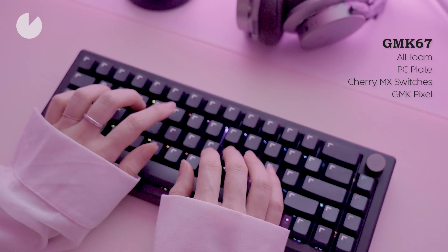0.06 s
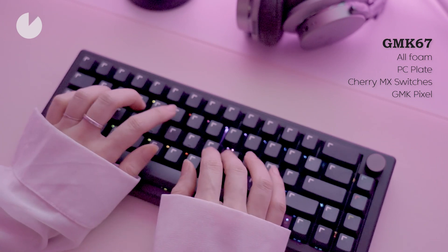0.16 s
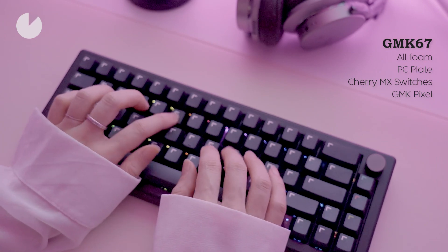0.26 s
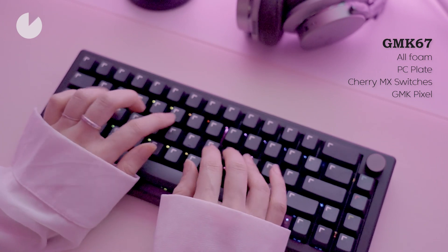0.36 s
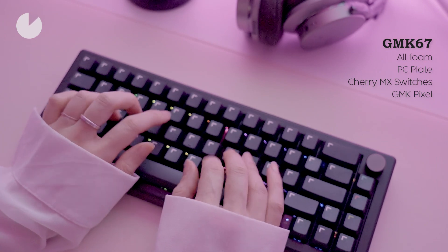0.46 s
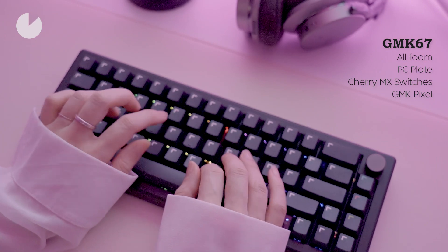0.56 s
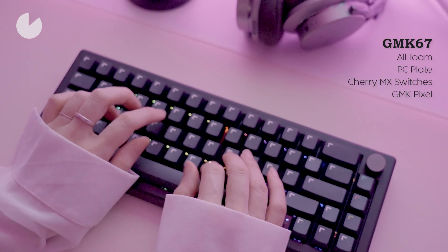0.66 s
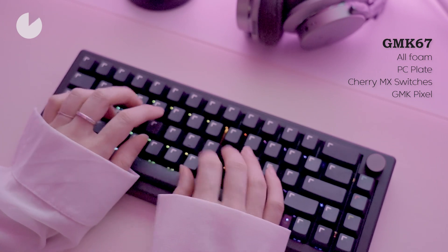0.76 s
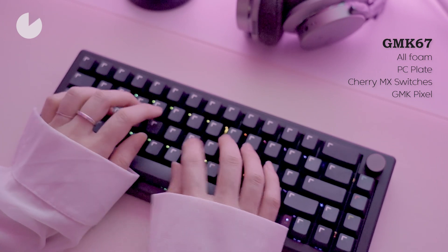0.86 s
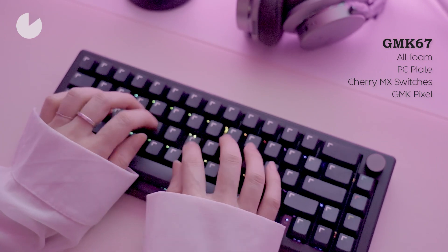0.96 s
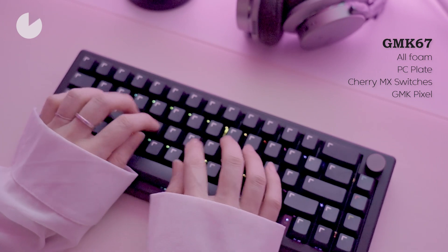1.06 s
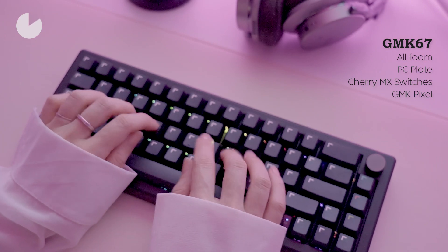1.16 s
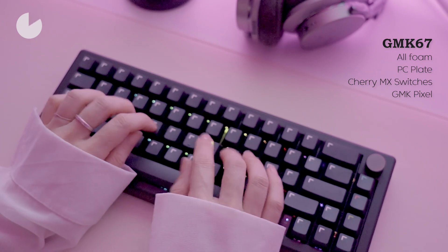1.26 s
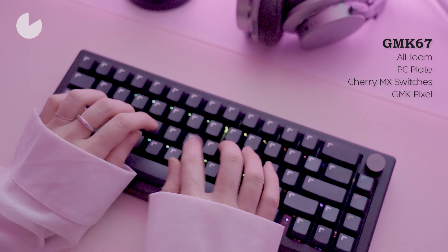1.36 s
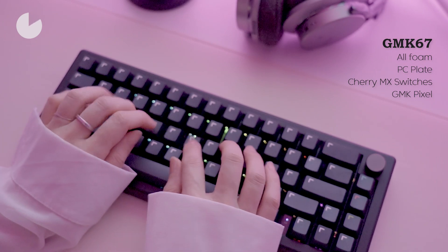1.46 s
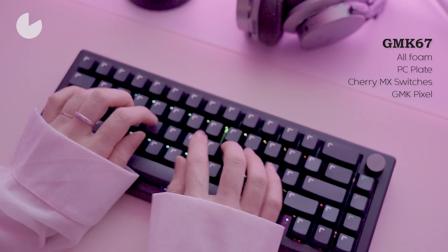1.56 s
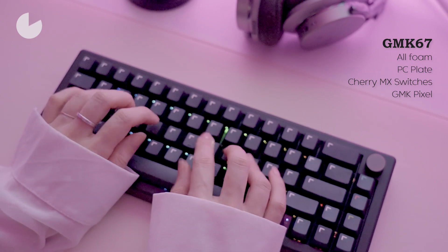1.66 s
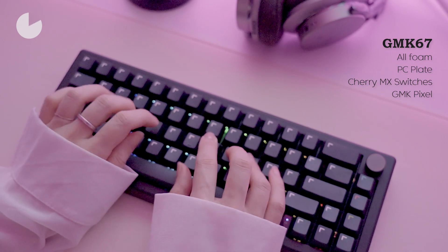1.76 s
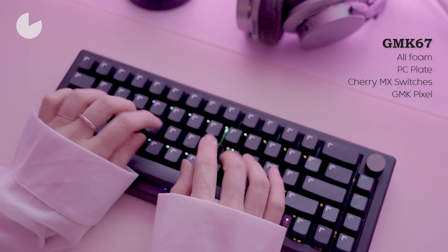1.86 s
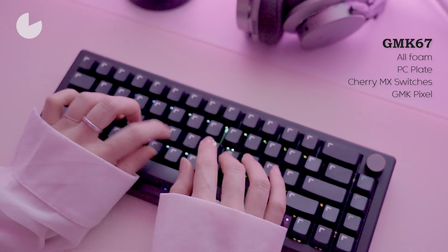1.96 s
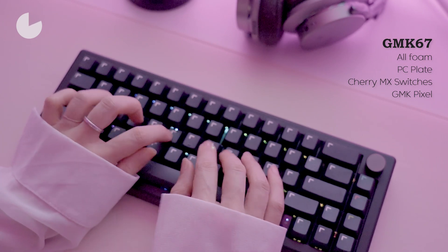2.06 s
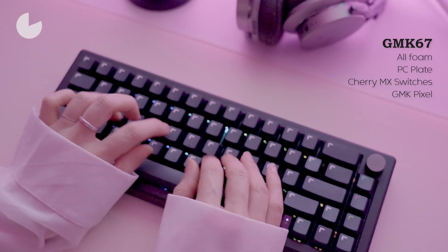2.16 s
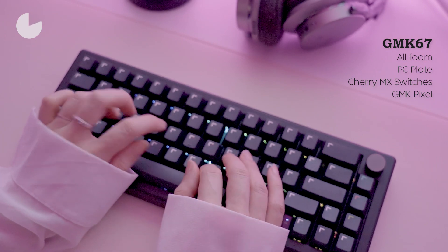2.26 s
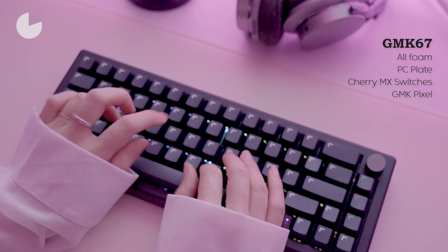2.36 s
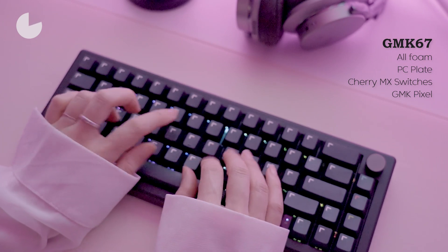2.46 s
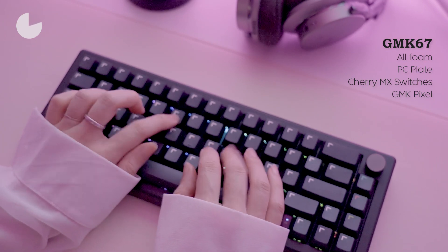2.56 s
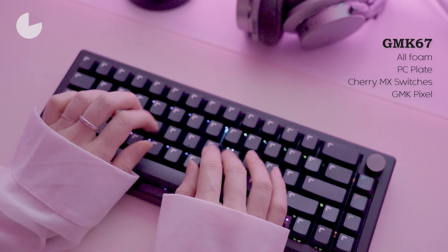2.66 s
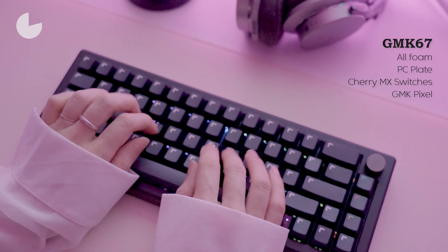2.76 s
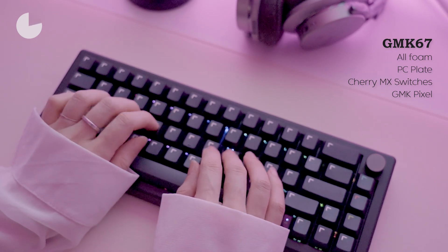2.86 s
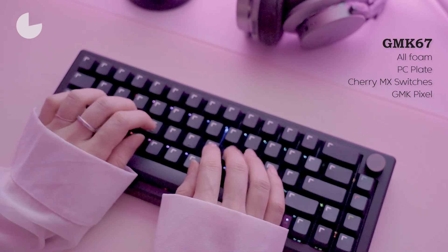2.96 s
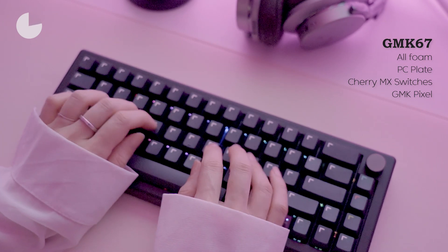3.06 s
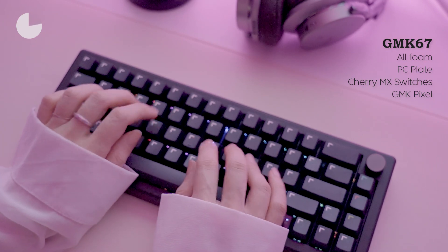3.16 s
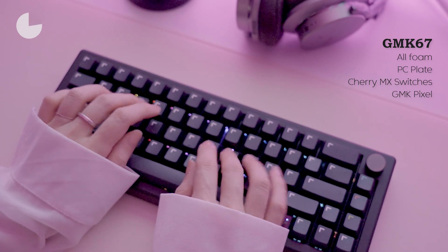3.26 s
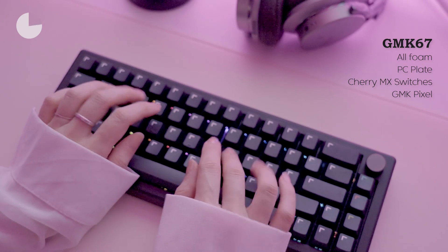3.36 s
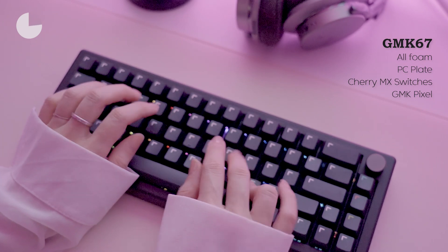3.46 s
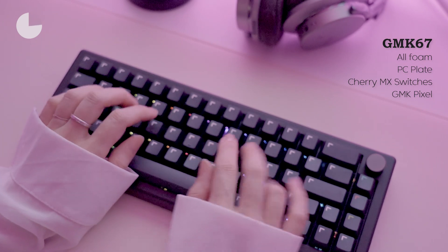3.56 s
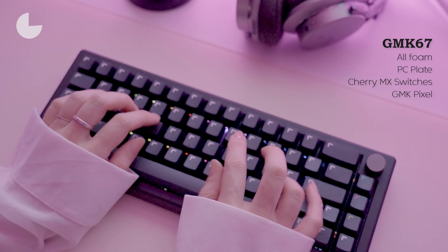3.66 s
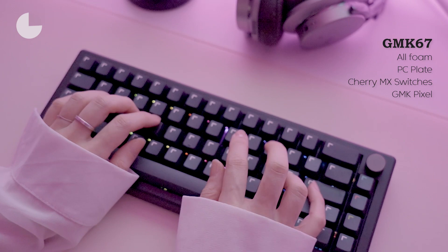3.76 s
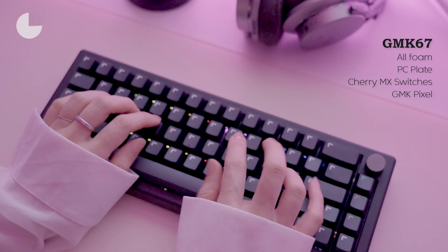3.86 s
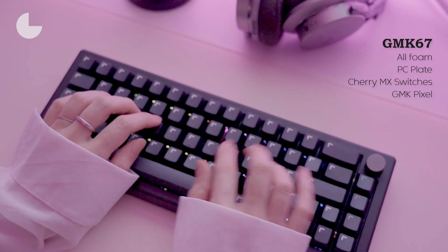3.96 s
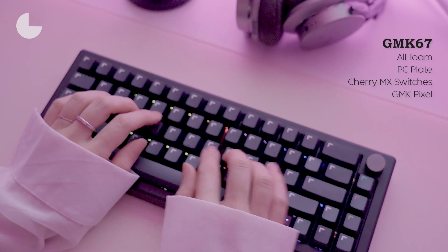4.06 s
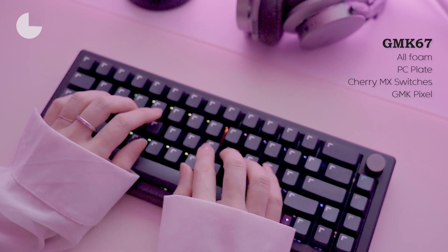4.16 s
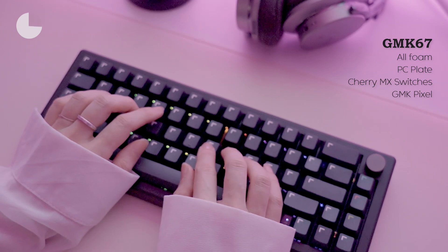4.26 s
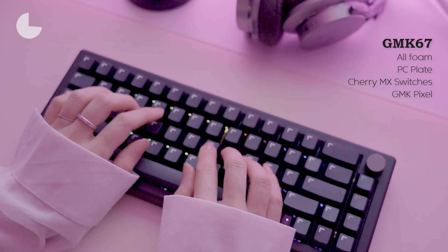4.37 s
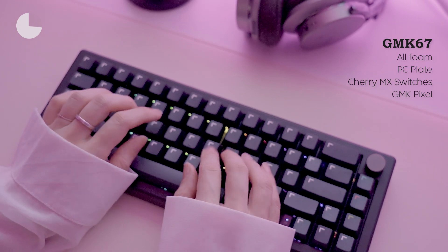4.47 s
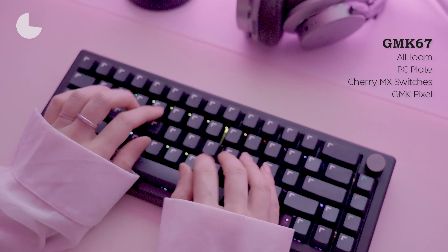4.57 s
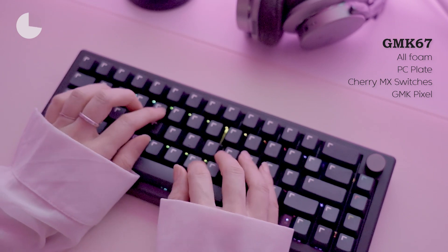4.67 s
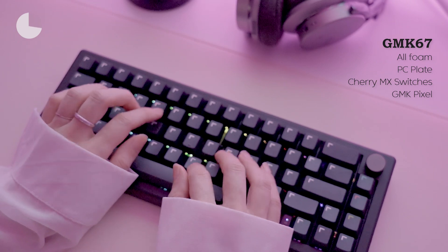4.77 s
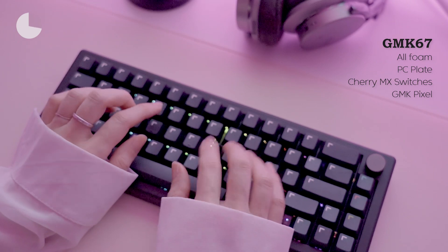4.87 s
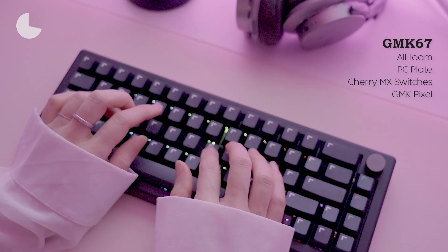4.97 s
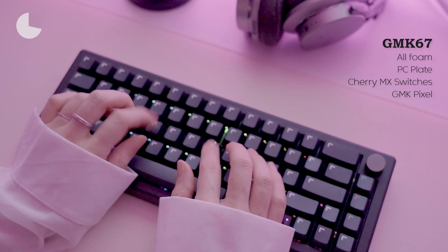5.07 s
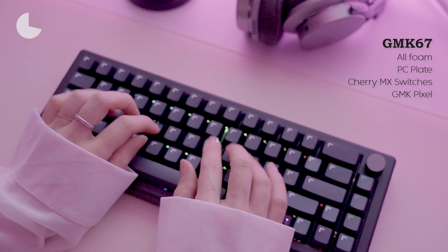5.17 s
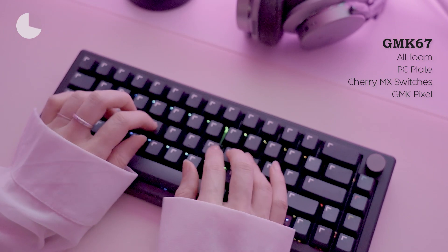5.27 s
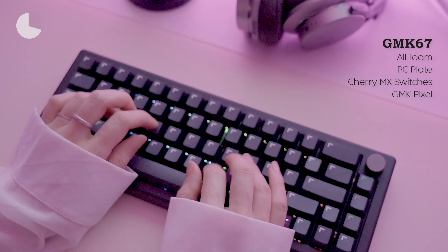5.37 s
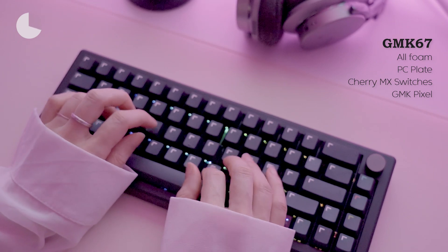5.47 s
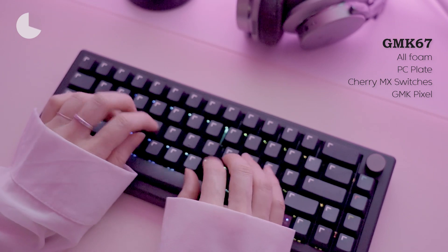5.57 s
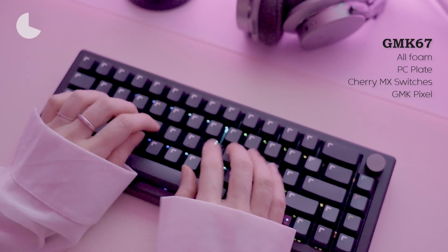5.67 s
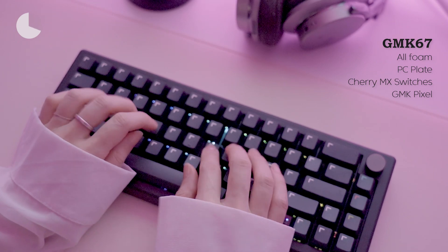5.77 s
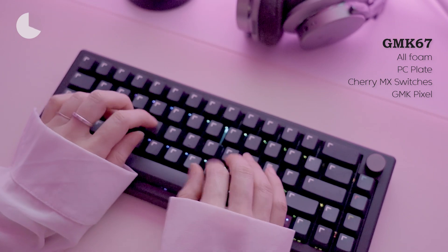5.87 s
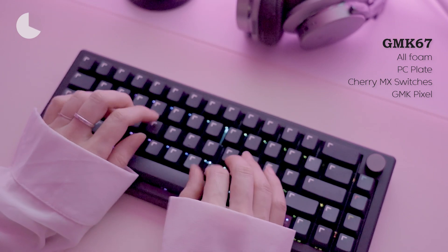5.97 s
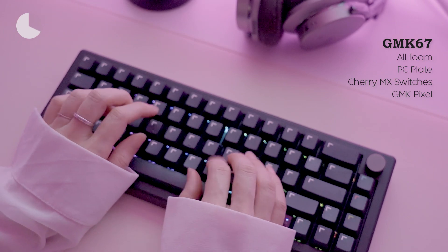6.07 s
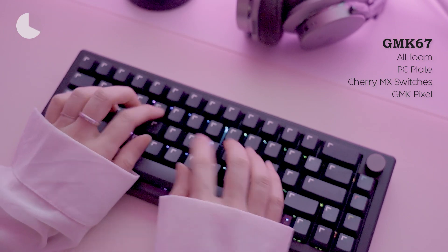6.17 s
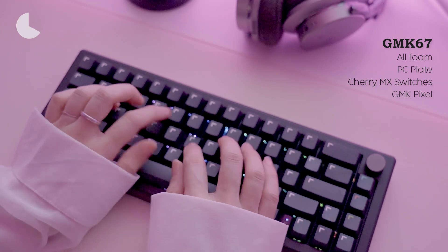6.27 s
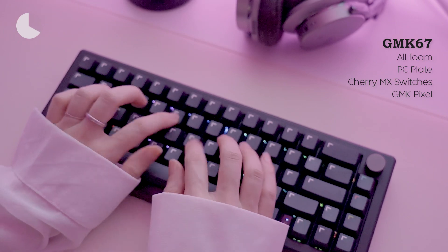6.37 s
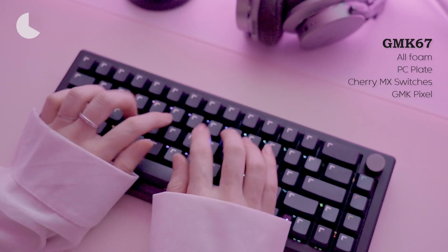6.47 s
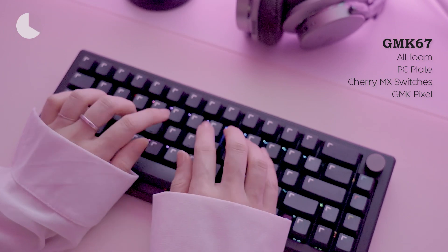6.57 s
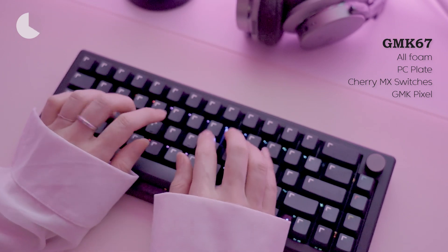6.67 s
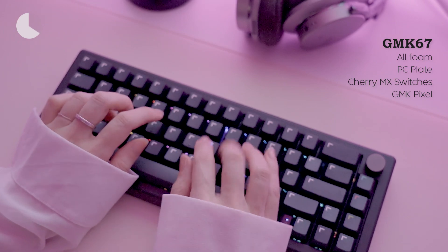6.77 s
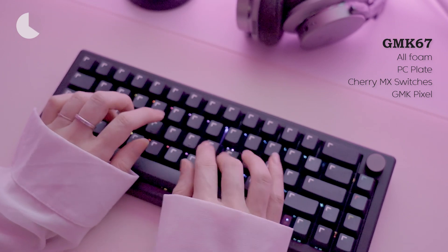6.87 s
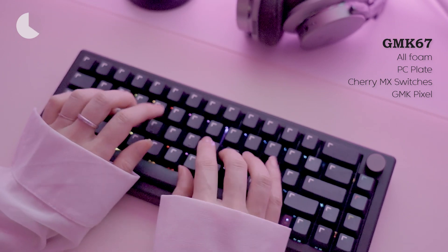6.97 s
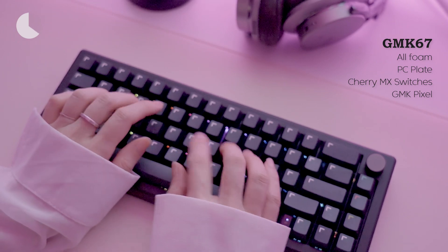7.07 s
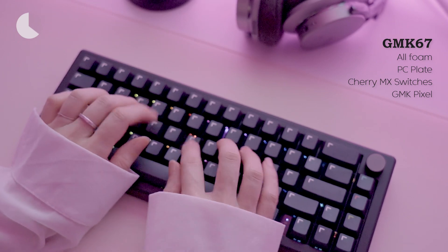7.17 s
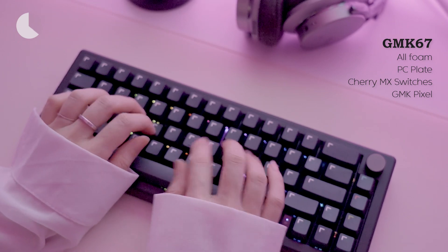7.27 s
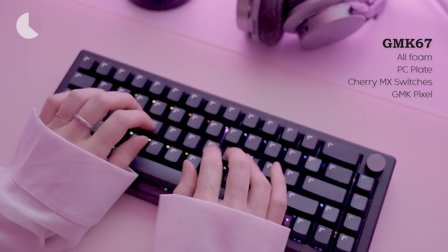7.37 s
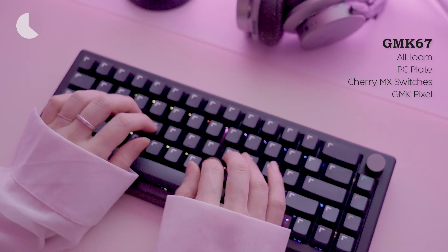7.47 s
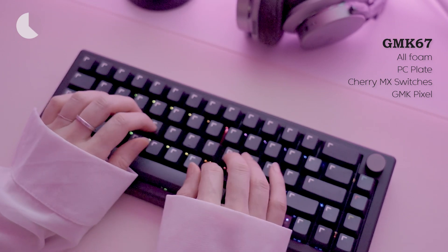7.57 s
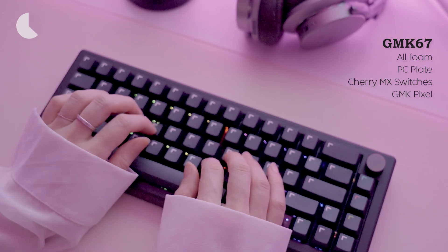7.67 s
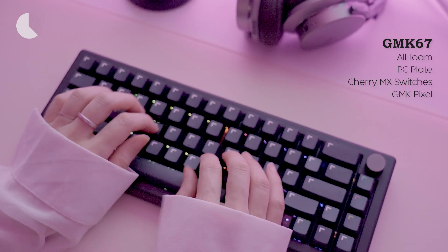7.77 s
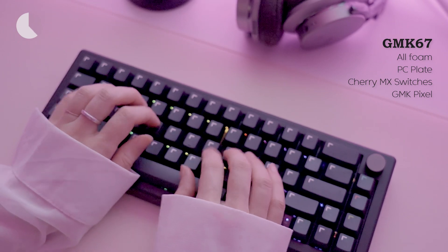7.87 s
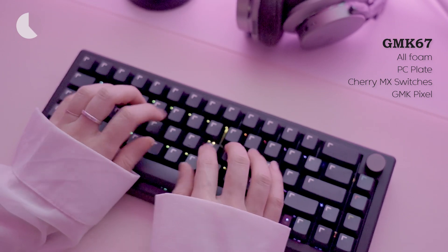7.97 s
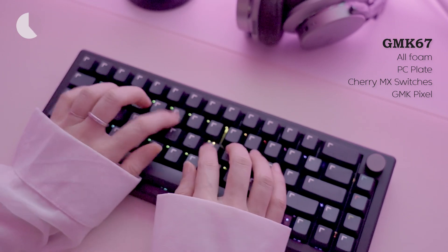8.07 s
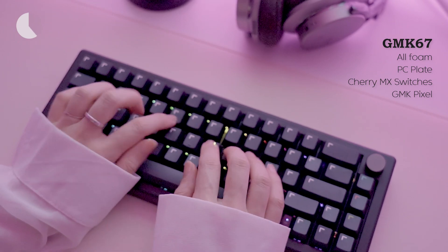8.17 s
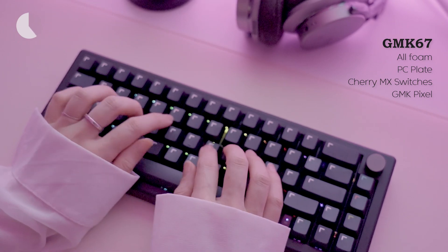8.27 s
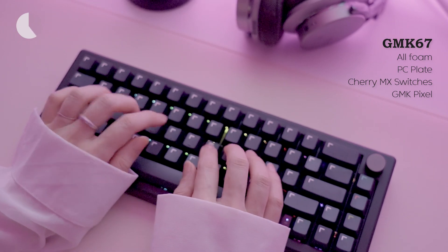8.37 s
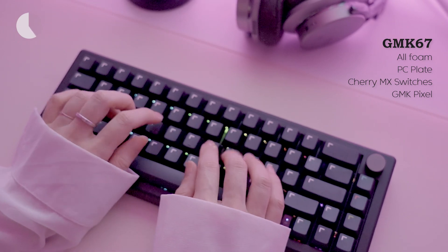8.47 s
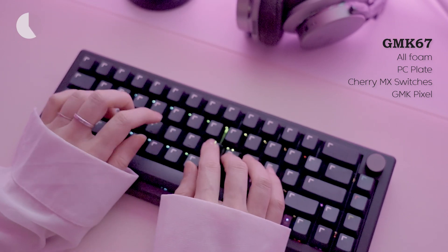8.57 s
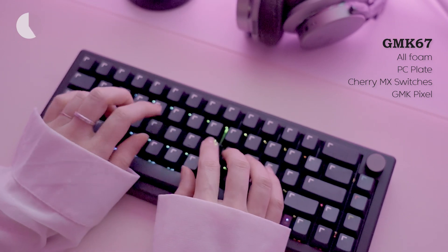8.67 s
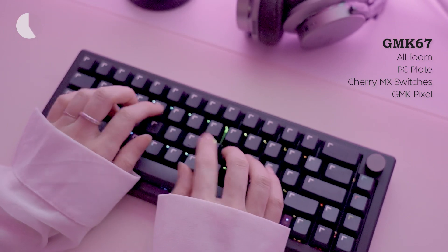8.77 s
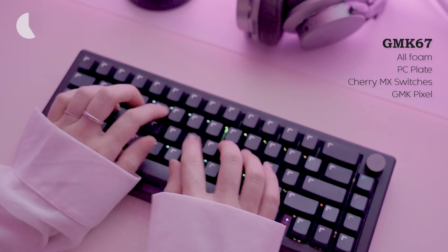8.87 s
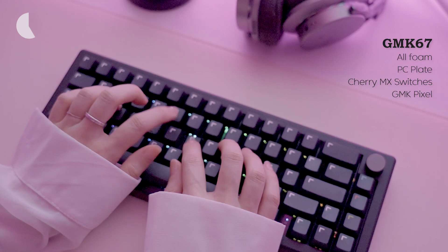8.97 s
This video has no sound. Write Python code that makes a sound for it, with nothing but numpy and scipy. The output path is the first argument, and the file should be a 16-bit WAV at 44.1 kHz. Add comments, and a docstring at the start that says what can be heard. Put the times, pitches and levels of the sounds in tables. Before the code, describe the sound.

From 0 s a soft, low fan whoosh and barely audible motor hum lie under close typing on a foam-filled mechanical keyboard on a desk. After a light first touch, rapid irregular keystrokes run until about 3.55 s, often over twenty small contacts per second counting presses and releases. Each is a very short, muted, mid-pitched knock with a plastic clack and fine tick. The long bar adds deeper thumps with slight rattle and metallic ring near 0.86, 1.8 and 2.5 s. Around 3.6 s fingertips brush the caps faintly; then comes a sparse pause with a few weak taps and a hard, dull knock near 3.97 s. Near 4.7 s quick typing resumes, continuing to about 9 s, with heavier bar strokes at 5.7, 6.1, 7.03 (strongest), 7.9 and 8.76 s, and a sharp accent at 7.33 s. Dry, close, small quiet room.

```python
"""Quick typing on a foam-filled mechanical keyboard on a desk, close to one microphone in a small quiet room.
Fan noise, a wavering motor hum and the slide of fingertips are there from the start. Then come the keys: each
contact knocks the plate, clacks the cap, ticks in the switch and thumps case and desk, and the room adds a short
tail. Loose contacts chatter. Before one second the long bar's wire first rings. Near 3.6 s fingertips brush the
caps; a pause with only a few contacts follows, one a hard, dull knock, then quick typing from about 4.7 s on."""
import sys
import numpy as np
from scipy import signal
from scipy.fft import rfft, irfft
from scipy.io import wavfile
from scipy.ndimage import uniform_filter1d

SR = 44100
rng = np.random.default_rng(int(sys.argv[2]) if len(sys.argv) > 2 else 0)


def wav_out(sig):
    """Save sig, one row per channel (or a flat mono array), as 16-bit PCM at SR to the path in sys.argv[1]."""
    wavfile.write(sys.argv[1], SR, np.round(np.clip(np.atleast_2d(sig).T, -1, 1) * 32767).astype(np.int16))


N = 397782

# Every key contact, with the strength of each part before chatter and filtering:
# start_s, plate_knock_db, plate_pitch_hz (under the key), case_thump_db, cap_clack_db, stem_tick_db
KEY_CONTACTS = [(0.116, -33, 1160, -54, -48.5, -63), (0.216, -26, 1340, -41, -32.5, -42),
                (0.336, -25.5, 1150, -45, -34, -45), (0.402, -40, 1240, -49, -48, -57),
                (0.451, -30.5, 1220, -42, -38.5, -50), (0.485, -36, 920, -48, -45, -47),
                (0.527, -26.5, 1330, -36, -33.5, -34.5), (0.572, -33, 870, -56, -49, -63),
                (0.601, -34.5, 1170, -47, -42, -49), (0.622, -28, 1120, -43, -38, -46),
                (0.643, -26.5, 810, -42.5, -31.5, -47), (0.688, -35, 990, -48, -44, -44),
                (0.722, -28, 950, -32, -34.5, -36.5), (0.81, -33, 1070, -47, -45, -63),
                (0.841, -30, 1090, -47, -46, -50), (0.861, -22.5, 1170, -21.5, -26.5, -40.5),
                (0.923, -30.5, 1010, -40, -36.5, -50), (0.936, -47, 1070, -41, -57, -45),
                (0.967, -38, 1020, -53, -60, -74), (0.991, -39, 1160, -65, -68, -67),
                (1.03, -32.5, 920, -47, -37, -47), (1.069, -39, 1010, -45, -48, -50),
                (1.085, -29.5, 1000, -47, -37.5, -49), (1.113, -30, 1120, -53, -49, -55),
                (1.138, -28, 940, -44, -39.5, -57), (1.181, -29.5, 1010, -40.5, -43, -43),
                (1.215, -25.5, 1170, -35.5, -26.5, -35.5), (1.253, -35.5, 1070, -45, -45, -37),
                (1.284, -29, 1310, -45, -37.5, -53), (1.302, -25, 930, -49, -46, -50),
                (1.372, -35, 890, -57, -45, -45), (1.379, -28, 1330, -38.5, -44, -61),
                (1.403, -22, 830, -30, -29.5, -39.5), (1.495, -29.5, 1020, -45, -34, -45.5),
                (1.55, -34, 1070, -42, -58, -64), (1.597, -26, 940, -39, -37.5, -55),
                (1.682, -24, 1120, -36, -33.5, -41), (1.73, -28.5, 1270, -52, -36.5, -44),
                (1.774, -31, 1020, -49, -42, -50), (1.785, -28.5, 1100, -40, -43, -65),
                (1.795, -23.5, 1160, -23, -28.5, -47), (1.844, -32, 800, -51, -50, -53),
                (1.887, -31.5, 1120, -32, -42, -42.5), (1.898, -31.5, 940, -47, -37.5, -54),
                (1.951, -32.5, 1050, -37.5, -42, -39), (1.974, -25, 1440, -47, -40, -44),
                (2.008, -30.5, 840, -35, -47, -52), (2.047, -37, 1090, -48, -64, -73),
                (2.07, -38, 1110, -48, -42, -43), (2.1, -25.5, 930, -36, -33.5, -44.5),
                (2.133, -26.5, 1160, -56, -47, -53), (2.175, -33.5, 1110, -51, -54, -65),
                (2.207, -27.5, 840, -44, -33.5, -45), (2.237, -36, 855, -47, -49, -47),
                (2.272, -27, 810, -28.5, -30, -30.5), (2.305, -33, 1210, -47, -48, -48),
                (2.359, -21, 1080, -40, -29, -39.5), (2.433, -38, 1070, -46, -46, -46),
                (2.467, -27.5, 880, -31.5, -38, -38), (2.486, -36, 1080, -51, -42, -44),
                (2.515, -29, 1230, -27.5, -41, -55), (2.607, -28.5, 1020, -40, -46, -46),
                (2.629, -34, 1090, -50, -43.5, -56), (2.648, -31, 1040, -51, -53, -61),
                (2.705, -23.5, 1230, -38, -31, -44), (2.77, -38, 960, -45, -41.5, -41),
                (2.79, -29.5, 1020, -47, -51, -55), (2.803, -29, 1040, -30.5, -26.5, -31),
                (2.892, -29.5, 1070, -40, -43, -42), (2.929, -24.5, 990, -33, -35, -37.5),
                (3.019, -35, 1140, -50, -54, -63), (3.035, -22, 1020, -42, -37, -52),
                (3.091, -32.5, 1110, -43, -42.5, -44), (3.123, -24, 850, -30, -34, -37),
                (3.19, -34, 1210, -59, -39, -47.5), (3.208, -22, 1100, -39.5, -44, -46),
                (3.294, -38, 1110, -43, -38, -42), (3.327, -32.5, 1040, -38, -35, -48),
                (3.353, -29, 1210, -49, -40, -56), (3.412, -30, 1120, -49, -42, -54),
                (3.471, -30, 1180, -53, -44, -59), (3.514, -42, 1000, -44, -44, -40),
                (3.542, -25, 1210, -40, -30, -35), (3.686, -37, 980, -52, -48, -80),
                (3.783, -38.5, 1050, -42, -64, -59), (3.806, -32.5, 1070, -42, -55, -60),
                (3.93, -37.5, 890, -51, -69, -75), (3.968, -22.5, 950, -37, -51, -57),
                (4.18, -45, 965, -53, -57, -71), (4.214, -41, 950, -53, -56, -70),
                (4.652, -43, 860, -58, -50.5, -58), (4.725, -22.5, 1130, -41, -26.5, -34.5),
                (4.826, -25, 1000, -41, -36.5, -41), (4.846, -30, 1080, -56, -41, -49),
                (4.912, -23.5, 924, -42, -33.5, -40), (5.024, -35, 806, -47, -45, -44),
                (5.039, -29, 1000, -44, -36.5, -46), (5.084, -27, 900, -33, -37.5, -48),
                (5.134, -27.5, 1050, -52, -46, -57), (5.186, -37.5, 960, -41, -39, -36),
                (5.213, -26, 990, -35.5, -31, -38), (5.23, -22.5, 1140, -49, -40, -44),
                (5.258, -40, 1090, -49, -57, -52), (5.293, -26.5, 1250, -42.5, -38, -45),
                (5.326, -24, 970, -42, -39, -48), (5.357, -45, 860, -41.5, -54, -41.5),
                (5.393, -26.5, 920, -34, -34, -35), (5.426, -35, 1170, -55, -59, -59),
                (5.456, -35, 1190, -52, -43, -42), (5.481, -21.5, 1050, -42, -33, -46),
                (5.494, -29, 1070, -43, -30, -48), (5.542, -36, 1230, -43, -62, -47),
                (5.58, -27, 930, -31, -38, -39.5), (5.615, -30, 1060, -48, -45, -58),
                (5.639, -33, 1070, -53, -50, -50), (5.667, -29.5, 1250, -29.5, -42, -54),
                (5.69, -40, 750, -36.5, -50, -61), (5.707, -31, 875, -48, -43, -45),
                (5.74, -23, 880, -26, -30, -33.5), (5.761, -53, 676, -53, -58, -56),
                (5.8, -27, 1170, -38, -35, -52), (5.808, -34, 1030, -55, -40, -46),
                (5.85, -25, 940, -59, -35.5, -51), (5.893, -29, 870, -44, -38, -46),
                (5.92, -27, 1300, -33.5, -33.5, -33.5), (5.969, -37, 1100, -46, -47, -50),
                (6.007, -29, 1000, -42, -35, -53), (6.088, -32.5, 1050, -47, -44, -59),
                (6.108, -20, 1150, -21.5, -27, -43.5), (6.225, -27, 1160, -46, -42, -38.5),
                (6.231, -45, 1130, -40, -40, -40), (6.262, -27.5, 1100, -37, -33, -40),
                (6.323, -40, 1020, -47, -52, -60), (6.34, -34.5, 1030, -45, -36, -46),
                (6.368, -21.5, 1150, -46, -29, -42), (6.455, -25, 1140, -47, -33, -42),
                (6.473, -26, 990, -38.5, -42, -59), (6.547, -31.5, 1110, -39.5, -37.5, -46.5),
                (6.593, -35, 860, -44, -42, -44), (6.625, -26, 950, -44, -38.5, -46),
                (6.737, -24.5, 1000, -46, -40, -50), (6.764, -39, 1000, -59, -53, -59),
                (6.785, -37, 1030, -56, -39.5, -54), (6.798, -36, 920, -42, -58, -50),
                (6.837, -28.5, 900, -31.5, -28, -32), (6.887, -35.5, 1300, -48, -56, -40),
                (6.914, -27, 1050, -37, -36, -43), (7, -35, 1050, -50, -51, -56),
                (7.015, -29, 1060, -35, -38, -46), (7.03, -17, 1200, -20.5, -22, -34),
                (7.051, -25, 830, -48, -35, -57), (7.135, -27.5, 1150, -40, -36, -43.5),
                (7.171, -27, 910, -32.5, -33, -38.5), (7.265, -37.5, 1130, -50, -40, -54),
                (7.316, -38, 960, -37, -38, -40), (7.33, -17.5, 1060, -30.5, -20, -30),
                (7.347, -20.5, 930, -37, -28.5, -33), (7.424, -27.5, 1290, -42, -35, -44),
                (7.438, -50, 860, -48, -56, -52), (7.447, -20.5, 990, -49, -35, -43),
                (7.514, -37.5, 950, -44, -41, -46.5), (7.562, -29.5, 1000, -48, -43, -47),
                (7.611, -30, 1040, -44, -32.5, -54), (7.624, -22.5, 1010, -52, -34, -44),
                (7.701, -41, 770, -45.5, -47, -53), (7.749, -26, 980, -38, -33.5, -44),
                (7.868, -28, 1040, -42, -39, -50), (7.888, -24.5, 1220, -22.5, -28.5, -41.5),
                (7.926, -27.5, 1030, -42, -42, -53), (7.974, -35.5, 1020, -48, -46, -55),
                (8.012, -33, 1150, -42, -38.5, -47), (8.075, -29.5, 1070, -45, -35.5, -43),
                (8.188, -26.5, 1080, -37.5, -34, -48.5), (8.294, -35, 1050, -48, -42, -52),
                (8.306, -30.5, 1090, -46, -48, -46), (8.341, -23.5, 960, -32.5, -37, -39.5),
                (8.446, -21.5, 1060, -42, -36, -48), (8.483, -26.5, 1010, -51, -38.5, -51),
                (8.519, -35, 970, -42, -42, -39.5), (8.551, -25.5, 806, -31.5, -33.5, -43),
                (8.559, -40, 1190, -45, -45, -43), (8.598, -32.5, 1280, -46, -42, -51),
                (8.646, -29, 1150, -42.5, -44, -46), (8.701, -36, 824, -45, -50, -49),
                (8.742, -28, 1110, -37, -41, -50), (8.76, -20, 1220, -21, -24, -38),
                (8.861, -31, 1110, -35.5, -36, -40), (8.898, -28.5, 1060, -39.5, -31.5, -38.5),
                (8.937, -26.5, 970, -43, -47, -55), (8.98, -41, 1410, -54, -50, -51),
                (8.993, -23, 1110, -37.5, -38, -46), (9.008, -32, 950, -56, -26.5, -42)]
# The long bar's wire, struck going down and up: start_s, peak_level_db
BAR_STROKES = [(0.8609, -48), (0.9353, -62), (1.4037, -68), (1.7943, -39.5), (1.8866, -46), (2.5137, -48),
               (2.6065, -50), (5.6675, -47), (6.107, -42), (6.2224, -41), (7.0299, -33.5), (7.1344, -62),
               (7.887, -46), (7.9738, -57), (8.76, -39), (8.8608, -50)]
SCATTER_DB = 2.5  # how much the modes of the light parts and the wire vary in level from blow to blow


def undb(db):
    """Turn decibels into a plain multiplier."""
    return 10 ** (np.asarray(db) / 20)


def decay(t, t60_s):
    """A ring dies away exponentially, falling 60 dB in t60_s."""
    return np.exp(-np.log(1000) * t / t60_s)


def band(x, low_hz, high_hz):
    """Keep mainly what lies between two pitches."""
    return signal.sosfilt(signal.butter(2, [low_hz, high_hz], "bandpass", fs=SR, output="sos"), x)


def fan():
    """Moving air makes steady noise, with more power at some pitches than at others."""
    # Shape of the air noise: pitch_hz, relative_level_db (per Hz)
    air_shape = [(15, -42), (25, -14), (45, -6), (85, -32), (140, -0.5), (205, -1.5), (280, -1), (550, 4),
                 (850, -4.5), (1150, -5.5), (1500, -10.5), (2050, -32), (2700, -21.5), (4500, -30.5),
                 (11500, -41.5), (16000, -60)]
    air_rms_db = -53.5
    shape_hz, shape_db = np.transpose(air_shape)
    hz = np.arange(N // 2 + 1) * SR / N + 1  # the added 1 avoids the logarithm of zero
    gain = undb(np.interp(np.log(hz), np.log(shape_hz), shape_db))
    air = irfft(rfft(rng.standard_normal(N)) * gain, N)
    return air * undb(air_rms_db) / air.std()


def motor_hum():
    """A motor hums on a few low tones whose levels slowly waver."""
    # Tones of the hum: pitch_hz, middle_level_db (rms)
    hum_tones = [(58.8, -72.5), (119, -70.5)]
    waver_db = 3.7
    t = np.arange(N) / SR
    out = np.zeros(N)
    for hz, db in hum_tones:
        waver = uniform_filter1d(rng.standard_normal(N), size=4000)
        waver = uniform_filter1d(waver, size=4000)
        level = undb(db + waver_db * waver / waver.std())
        out += level * np.sqrt(2) * np.sin(2 * np.pi * hz * t)
    return out


def fingertips(low_hz=2000., high_hz=11000., grain_db=2.2):
    """Skin on textured plastic: fine noise in uneven grains, a steady slide with single brushes on top."""
    # Brushes added to the slide: peak_s, level_db (rms at the peak)
    brushes = [(3.6, -78), (3.65, -74)]
    slide_db, rest_db = -82.5, -96  # rms while typing, and in the pause
    rest_start_s, rest_end_s = 3.85, 4.65
    rise_s, fade_s = .012, .029
    t = np.arange(N) / SR
    typing = 1. * ((t < rest_start_s) | (t > rest_end_s))
    typing = uniform_filter1d(typing, size=8000)  # soften the change
    level = undb(rest_db + (slide_db - rest_db) * typing)
    for peak_s, db in brushes:
        level += undb(db) * np.exp(-np.abs(t - peak_s) / np.where(t < peak_s, rise_s, fade_s))
    grain = uniform_filter1d(rng.standard_normal(N), size=150)
    rub = rng.standard_normal(N) * undb(grain_db * grain / grain.std())
    rub = band(rub, low_hz, high_hz)
    return rub / rub.std() * level


def ring(rows, modes, weight_db, scatter_db, detune, rise_s, span_s, signs=None):
    """One ring per row, peak 1: a blow sets off decaying tones, each with its own chance level and pitch."""
    hz, db, t60_s = np.transpose(modes)
    t = np.arange(int(span_s * SR)) / SR
    chance = rng.standard_normal((len(rows), 3, len(hz)))
    # unless signs are given, chance decides which way each mode is pushed
    push = np.sign(chance[:, 2]) if signs is None else signs
    gain = undb(db + weight_db + scatter_db * chance[:, 0]) * push
    out = np.zeros((len(rows), len(t)))
    for k in range(len(hz)):
        pitch_hz = hz[k] * (1 + detune * chance[:, 1, k, None])
        out += gain[:, k, None] * np.sin(2 * np.pi * pitch_hz * t) * decay(t, t60_s[k])
    out *= 1 - np.exp(-t / rise_s)  # the push takes a moment to arrive
    return out / np.abs(out).max(axis=1, keepdims=True)


def place(rows, rings):
    """Add each ring at the start time of its row."""
    out = np.zeros(N + SR)
    for row, sound in zip(rows, rings):
        at = int(row[0] * SR)
        out[at:at + len(sound)] += sound
    return out[:N]


def contact_rules(start_s, plate_db, stem_db):
    """Knock, tick and bar strokes set how loud the housing is and how long each contact chatters."""
    # the housing follows knock and tick (dB per dB); the bar's stabilisers add rattle
    housing_db, per_knock, per_tick, bar_rattle_db = -11.5, .22, .67, 10.5
    # middle chatter length at this tick and knock; so many dB more of either halves it
    middle_ms, middle_tick_db, middle_knock_db = 1.41, -46, -29
    tick_halving_db, knock_halving_db = 24, 16
    spread_octaves = .3  # random share, contact to contact
    same_s, lead_s, slack_ms = .004, .025, 5.7  # the bar takes up slack just before it lands
    to_bar_s = np.array(BAR_STROKES)[:, 0] - start_s[:, None]
    on_bar = (np.abs(to_bar_s) < same_s).any(axis=1)
    slack = ((to_bar_s >= same_s) & (to_bar_s < lead_s)).any(axis=1)
    housing_db = housing_db + per_knock * plate_db + per_tick * stem_db
    housing_db = housing_db + bar_rattle_db * (on_bar | slack)
    loose = (middle_tick_db - stem_db) / tick_halving_db
    loose = loose + (middle_knock_db - plate_db) / knock_halving_db
    ms = middle_ms * 2 ** (loose + spread_octaves * rng.standard_normal(len(start_s)))
    return housing_db, np.where(slack, slack_ms, ms)


def chatter(ms, firm_ms=1.0, bounces_per_s=2900.0):
    """A first touch, then small random bounces that die away; a long chatter starts softly."""
    t = np.arange(1536) / SR
    ms = np.maximum(ms, .1)
    chance = rng.random((len(ms), 2, len(t)))
    bounce = chance[:, 0] < bounces_per_s / SR
    strength = 2 * chance[:, 1] - 1
    hits = bounce * strength * np.exp(-(1000 * t / ms[:, None]) ** 2 / 4)
    hits[:, 0] = 1 + firm_ms / ms
    return hits


def light_parts():
    """Plate, cap, switch housing and stem ring at each contact, and feel every bounce."""
    # Ringing modes of each part before chance changes: pitch_hz, relative_level_db, t60_s (time to fall 60 dB)
    plate_modes = [(582, 19.5, 0.0091), (678, 14.5, 0.0063), (710, 8.5, 0.0047), (950, 4.5, 0.0089),
                   (946, 5.5, 0.014), (1043, 11, 0.0076), (1270, 0, 0.023), (1409, 8.5, 0.014),
                   (1440, -59, 0.021), (1565, -13, 0.02)]
    cap_modes = [(1950, -7, .009), (2200, -8, .009), (2430, -2, .013), (2600, 0, .014), (2760, -2, .012),
                 (2920, 0, .013), (3080, -2, .012), (3350, -8, .008)]
    housing_modes = [(3760, -4, 0.008), (4140, 16, 0.0034), (4860, -21, 0.0062), (4907, 2.5, 0.021),
                     (5430, 0.5, 0.015), (6040, 12, 0.0032)]
    stem_modes = [(6780, -2, 0.0097), (7320, -1, 0.0086), (7820, 8, 0.0031), (8850, -1.5, 0.0069),
                  (9680, 0, 0.004), (10720, 1.5, 0.0044), (11600, 2, 0.0061), (13130, -1, 0.0044)]
    plate_reach_octaves = .33  # how far from a key's own pitch the plate modes still answer
    rise_cycles = .4  # rise of a ring, in cycles of the part's middle mode
    start_s, plate_db, plate_hz, _, cap_db, stem_db = np.transpose(KEY_CONTACTS)
    housing_db, ms = contact_rules(start_s, plate_db, stem_db)
    away = np.log2(np.array(plate_modes)[:, 0] / plate_hz[:, None]) / plate_reach_octaves
    parts = ((plate_modes, plate_db, -10 * away ** 2 / 2), (cap_modes, cap_db, 0),
             (housing_modes, housing_db, 0), (stem_modes, stem_db, 0))
    size = 4096  # room for ring and chatter together
    bounces = rfft(chatter(ms), size)
    light = 0
    for modes, part_db, weight_db in parts:
        rise_s = rise_cycles / modes[len(modes) // 2][0]  # larger parts take the blow more slowly
        clean = ring(KEY_CONTACTS, modes, weight_db, SCATTER_DB, detune=.015, rise_s=rise_s, span_s=.05)
        clean = rfft(clean, size)
        bounced = clean * bounces
        # the bounces share out the energy of one clean blow
        share = np.linalg.norm(clean, axis=1) / np.linalg.norm(bounced, axis=1)
        light = light + (undb(part_db) * share)[:, None] * bounced
    return place(KEY_CONTACTS, irfft(light))


def case_thumps():
    """The heavy case feels one slow push; strong modes start opposed, so the thump swells late and beats."""
    # Ringing modes before chance changes: pitch_hz, relative_level_db, t60_s
    case_modes = [(145, -8, .1), (215, -9, .07), (277, -1, .1), (318, -10, .05), (356, 0, .1),
                  (400, -10, .05), (454, -2, .11), (520, -10, .06), (577, -8, .08), (622, -9, .07),
                  (760, -13, .05)]
    # Which way each case mode starts: direction (1 or -1)
    case_signs = [1, -1, 1, 1, -1, -1, 1, 1, -1, 1, -1]
    thump_db = np.transpose(KEY_CONTACTS)[3]
    thumps = ring(KEY_CONTACTS, case_modes, 0, scatter_db=3, detune=.012, rise_s=.002, span_s=.2,
                  signs=np.array(case_signs))
    return place(KEY_CONTACTS, undb(thump_db)[:, None] * thumps)


def room(x, gap_s=0.0017):
    """A few near echoes, then dense reflections: noise in bands, each with its own decay."""
    # Bands of the tail: centre_hz, t60_s, level_db (of the noise before its band filter)
    tail_bands = [(188, 0.32, -28), (432, 0.17, -22), (1260, 0.48, -45.5), (2550, 0.22, -36.5),
                  (5460, 0.24, -35.5), (12300, 0.18, -35.5)]
    # Echoes from desk, screen and wall: delay_ms, level_db
    near_echoes = [(2.6, -17.5), (8.6, -16), (17.3, -30.5)]
    t = np.arange(SR // 2) / SR
    tail = 0
    for hz, t60_s, db in tail_bands:
        noise = band(rng.standard_normal(len(t)), hz / 1.5, min(hz * 1.5, 20000))
        tail = tail + undb(db) * noise * decay(t, t60_s)
    tail *= 1 - np.exp(-(t / gap_s) ** 2)  # dense reflections need a moment to build up
    for ms, db in near_echoes:
        tail[int(ms * SR / 1000)] += undb(db)
    return signal.fftconvolve(x, tail)[:N]


def bar_wire():
    """The long bar's wire rings on a few high modes at each stroke."""
    # Ringing modes before chance changes: pitch_hz, relative_level_db, t60_s
    wire_modes = [(4600, -1, 0.078), (5110, 13, 0.023), (5470, -14, 0.035), (7940, -4.5, 0.064)]
    peak = undb(np.array(BAR_STROKES)[:, 1:])
    rings = ring(BAR_STROKES, wire_modes, 0, SCATTER_DB, detune=.0059, rise_s=.00053, span_s=.15)
    return place(BAR_STROKES, peak * rings)


def without_bass(x, small_hz=367.0):
    """Small parts radiate no bass, so a high-pass filter weakens it."""
    return signal.sosfilt(signal.butter(2, small_hz, "highpass", fs=SR, output="sos"), x)


def scene():
    """Add the direct sound of the keyboard, its room sound, the fingertips and the background."""
    case_to_room_db = -7.5  # the case thumps mostly into the desk
    light = without_bass(light_parts() + bar_wire())
    heavy = case_thumps()
    reflected = room(light + undb(case_to_room_db) * heavy)
    background = fan() + motor_hum()
    return (light + heavy + reflected + fingertips() + background)[None]


def record(dry):
    """The recorder cuts the top with a steep low-pass filter."""
    top_hz = 16400
    return signal.sosfilt(signal.ellip(10, .2, 70, top_hz, fs=SR, output="sos"), dry)


dry = scene()
out = record(dry)
wav_out(out)
```